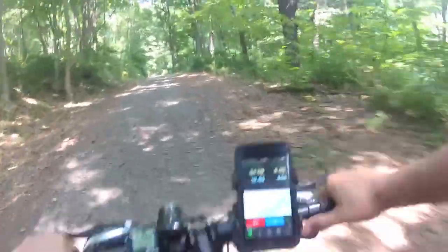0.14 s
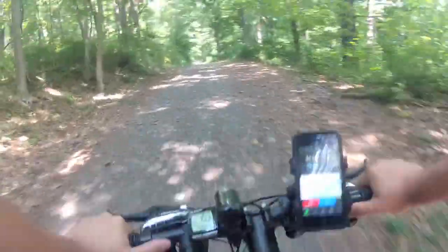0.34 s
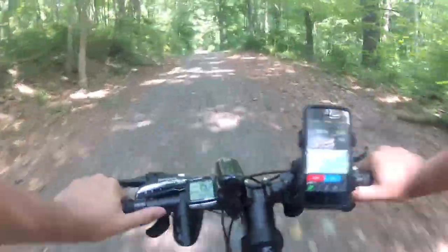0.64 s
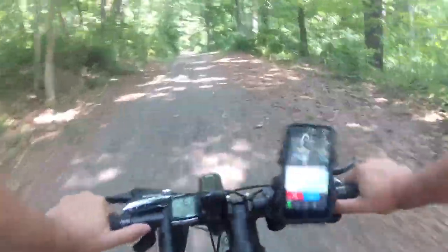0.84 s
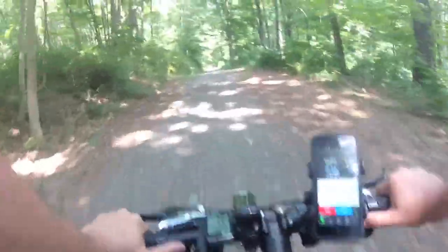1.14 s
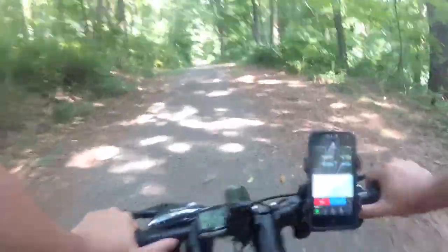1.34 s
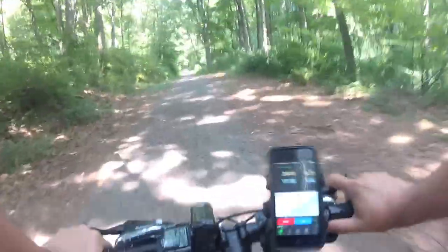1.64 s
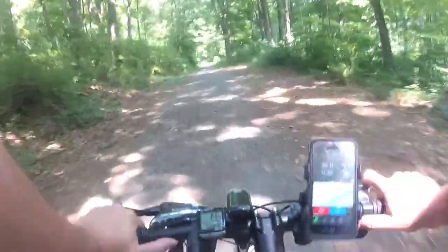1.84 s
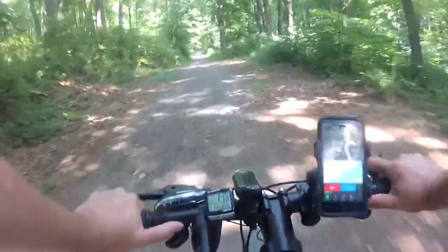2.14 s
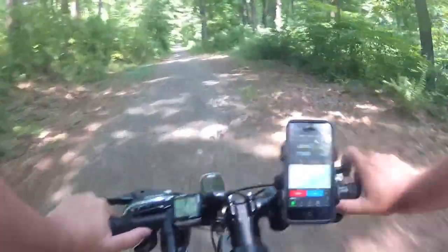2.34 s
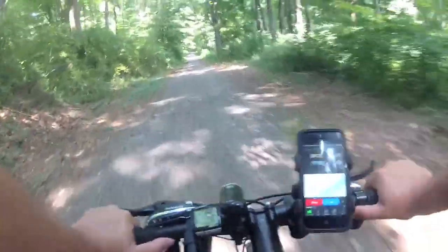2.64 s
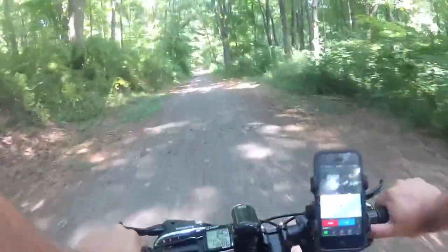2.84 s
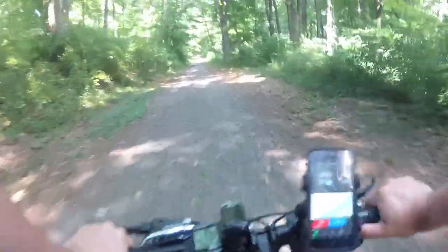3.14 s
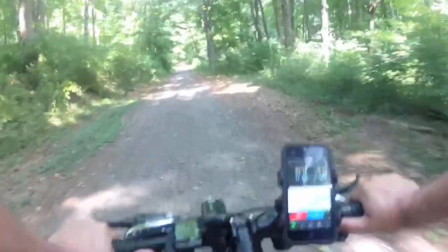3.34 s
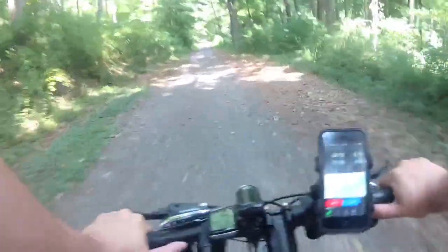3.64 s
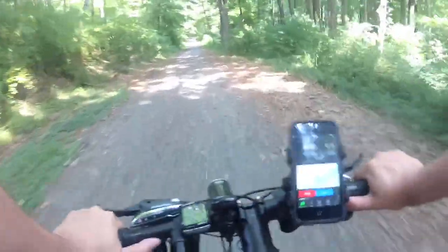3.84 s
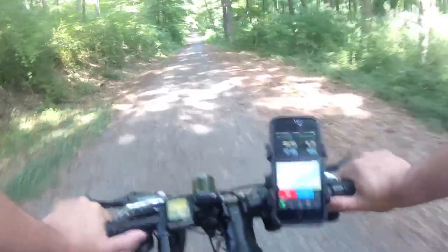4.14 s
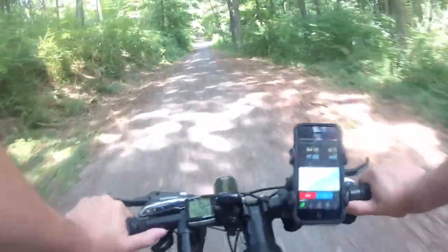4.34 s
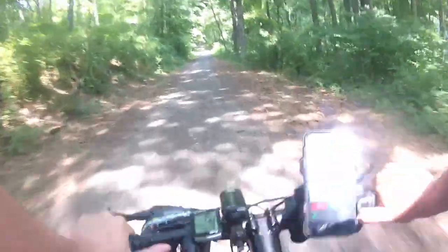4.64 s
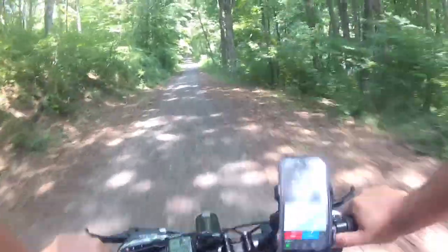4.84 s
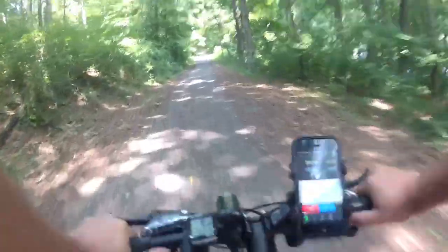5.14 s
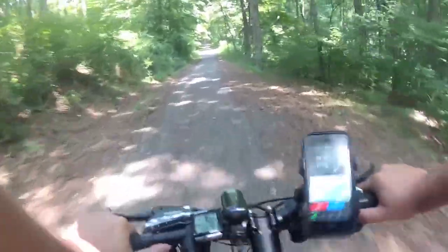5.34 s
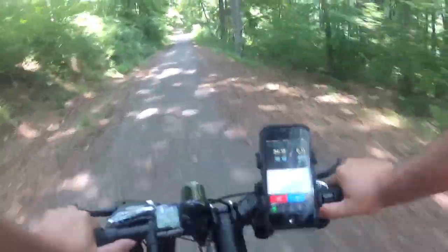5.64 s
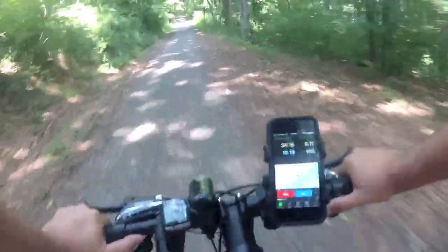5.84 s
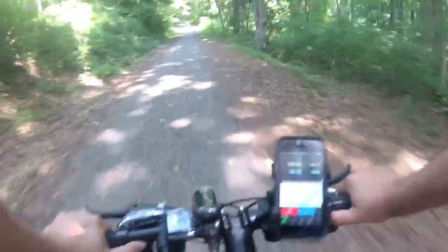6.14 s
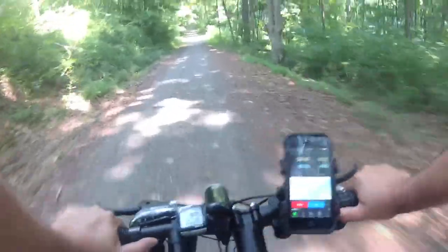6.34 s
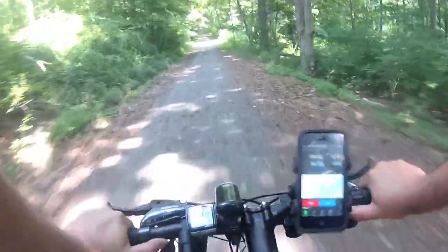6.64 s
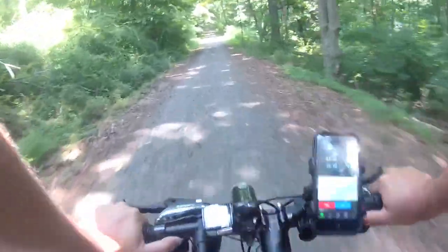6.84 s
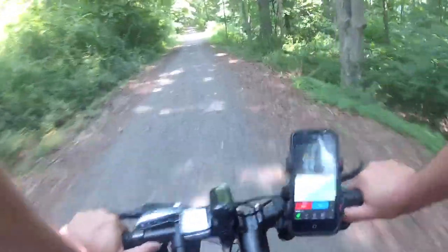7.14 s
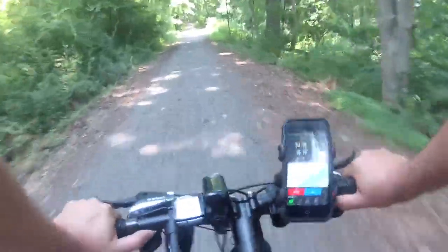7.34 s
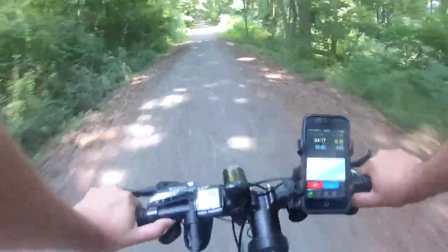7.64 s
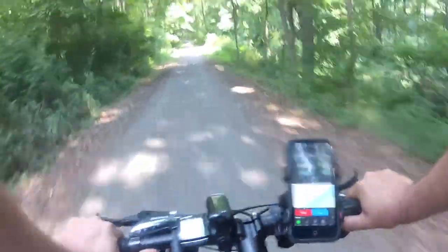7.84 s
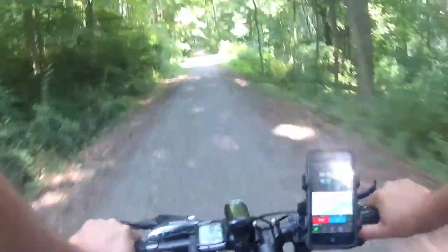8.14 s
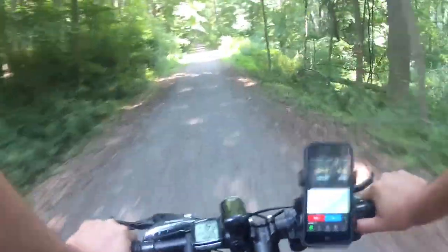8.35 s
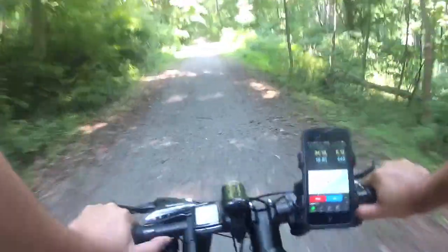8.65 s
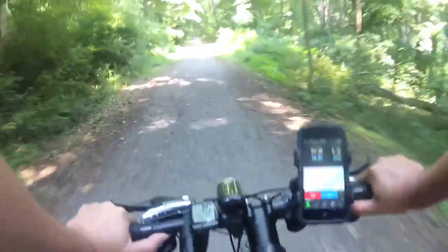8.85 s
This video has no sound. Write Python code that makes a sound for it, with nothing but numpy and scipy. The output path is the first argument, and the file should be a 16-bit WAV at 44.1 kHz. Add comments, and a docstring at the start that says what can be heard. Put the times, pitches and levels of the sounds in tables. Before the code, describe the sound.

Wind buffets a microphone carried by a rider on a woodland gravel trail, a low rumble with a fluttering rush above it. The bicycle's tyres make a continuous gritty crunch and a hollow drone, while flung stones and loose fittings click sharply at irregular moments. The pace is steady at first, then picks up in the second half, and wind, tyres and clicks all grow louder.

```python
"""Wind buffets and rushes past a rider's camera as a bicycle gathers speed down a woodland gravel trail.
Turbulent eddies on the case make the wind; the tyres snap pebbles into a crunch and shake the bike into
a drone. All three rise with speed; gusts swell the wind, rough patches the tyres. Flung stones and loose
fittings click on the bike. The camera's slow sample-and-hold mirrors the sound into a gritty treble."""
import sys
import numpy as np
from scipy import signal
from scipy.fft import rfft, irfft, next_fast_len
from scipy.io import wavfile
from scipy.ndimage import map_coordinates

SR = 44100
rng = np.random.default_rng(int(sys.argv[2]) if len(sys.argv) > 2 else 0)


def log_audio(samples):
    """Write samples as a 16-bit WAV file to the path given in sys.argv[1]."""
    # one column per channel
    frames = np.atleast_2d(samples).T
    # limit to full scale, then quantise
    limited = np.clip(frames, -1, 1)
    pcm = np.round(limited * 32767).astype(np.int16)
    wavfile.write(sys.argv[1], SR, pcm)


N = 396459

# spectra of the large and of the small eddies: frequency_hz, gain_db
BUFFET_SPECTRUM = [(12, -22), (28, -9), (55, -3), (90, -1), (150, -3), (250, -5.5), (400, -16),
                   (700, -28.5), (1500, -71)]
RUSH_SPECTRUM = [(100, -20), (250, -2), (330, 0.5), (480, 0), (690, -5.5), (830, -9.5), (1000, -20),
                 (1400, -29.5), (3000, -33), (6000, -71)]
# gusts and lulls: middle_s, length_s, strength_db
GUSTS = [(.57, 1, 7.5), (1.1, .4, 4.5), (1.62, 0.31, -7), (1.95, 0.36, 2.5), (2.33, 0.33, 5.5),
         (3.15, 1, -1), (3.7, 0.88, 4), (4.1, 0.42, 4), (5.79, .16, 7.5), (6.02, 0.2, 6), (7.05, 0.54, 2.5),
         (7.48, 0.52, 6.5), (8.3, 0.52, -1.5), (8.69, 0.13, 6), (8.92, 0.1, 5.5)]

def wind(lump_db=1.2, flutter_db=2, drift_db=0.94, rush_gust_share=0.13):
    """Turbulent pressure: large eddies thump on the case, small ones rush past in quick flurries."""
    gust_db = swells(GUSTS)[0] + drift_db * wobble(8)
    eddies = wobble(60)
    buffet = unit(coloured(rng.standard_normal(N), BUFFET_SPECTRUM) * amp(lump_db * eddies))
    rush = coloured(rng.standard_normal(N), RUSH_SPECTRUM)
    rush = unit(rush * amp(eddies + flutter_db * wobble(140)))
    buffet_db = speed_level(start_db=-27, doubling_db=12.8) + gust_db
    rush_db = speed_level(start_db=-28.5, doubling_db=9.2) + rush_gust_share * gust_db
    return amp(buffet_db) * buffet + amp(rush_db) * rush


# spectrum of gravel under the tread: frequency_hz, gain_db
CRUNCH_SPECTRUM = [(200, -44), (700, 1), (1100, -1), (1550, -3.5), (2000, 1.5), (2350, -1), (2800, 3),
                   (3400, -2.5), (4200, -6.5), (5000, -13), (6000, -16)]
# patches of trail that load or unload the tyres: middle_s, length_s, crunch_db, drone_db
PATCHES = [(.25, 0.4, 1, 4), (.7, 0.58, -1.5, 3), (1.0, 0.3, 2, -2), (2.39, 0.3, -4.5, -1),
           (2.54, 0.21, 5.5, 6.5), (3.3, 0.46, 1.5, 0), (4.0, 0.15, 2, 3.5), (6.27, 0.82, 1, 4.5),
           (6.6, 0.54, 2.5, 0.5), (7.42, 0.66, 1, 4.5), (8.26, .25, 4, 8), (8.52, 0.89, 3, 4.5),
           (8.93, 0.13, 2.5, 9.5)]

def gravel(clump_db=2, bump_db=1.75, grit_db=2.0, drift_db=.5, shudder_db=1):
    """Granular impact noise: pebbles snap under the tread in clumps, over the steadier hiss of grit."""
    crunch_db = speed_level(start_db=-34, doubling_db=3.6) + swells(PATCHES)[0] + drift_db * wobble(8)
    load = amp(bump_db * wobble(42) + shudder_db * wobble(240))  # the tyre presses harder on each bump
    snaps = amp(clump_db * wobble(250)) * pebbles()
    crunch = load * (snaps + amp(grit_db) * rng.standard_normal(N))
    return amp(crunch_db) * unit(coloured(crunch, CRUNCH_SPECTRUM))


def pebbles(spread_db=4.5, t60_s=0.0047, count=24000):
    """Shot noise: tiny damped snaps add at random times, each at its own pitch, a few of them large."""
    when, pitch, rank = rng.random((count, 3)).T[:, :, None]
    lag = np.arange(SR // 200)
    pitch_hz = 500 + 5000 * pitch
    size = amp(-spread_db * np.log(np.maximum(rank, .015)))
    snaps = size * np.sin(2 * np.pi * pitch_hz * lag / SR) * amp(-60 * lag / SR / t60_s)
    positions = (when * N).astype(int) + lag
    return unit(np.bincount(positions.ravel(), snaps.ravel(), N)[:N])


def tyre_drone(hum_hz=366, width_hz=38, upper_hz=690, upper_db=-9):
    """Forced resonance: the rolling tyres shake the bike at random and excite two narrow, hollow modes."""
    drone_db = speed_level(start_db=-32.5, doubling_db=6.9) + swells(PATCHES)[1]
    shaking = rng.standard_normal(N)
    modes = [(hum_hz, width_hz, 0), (upper_hz, 2 * width_hz, 0)]
    hum, upper = [unit(resonate(resonate(shaking, [mode]), [mode])) for mode in modes]
    return amp(drone_db) * (hum + amp(upper_db) * upper)


# spectrum of a hard contact: frequency_hz, gain_db
CRACK_SPECTRUM = [(200, 4), (800, -9), (1400, -14.5), (2000, 9.5), (2400, 5), (2800, 11), (3400, -1.5),
                  (4300, -4.5), (6000, -15)]
# hollow resonances of the camera case: centre_hz, width_hz, gain_db
CASE_MODES = [(356, 56, -7), (565, 170, 7.5), (640, 110, -6), (1040, 1200, -20)]
# loud contacts on the bike: start_s, level_db, ring_hz, knock_db (re the click), ring_db (re the crack)
CONTACTS = [(0.288, -8.5, 2000, -16, -1), (0.452, -9.5, 2900, -10, 4), (0.569, -6.5, 2740, -20, 6),
            (0.950, -4, 2010, -9, -12), (1.270, -12.5, 2800, -8, -3), (1.360, -13.5, 2350, -1.5, -9),
            (2.123, -10, 2680, -20, -6), (2.138, 0, 2260, -22, 2), (2.160, -14, 2100, -15, 1),
            (2.236, -6, 2130, -16, 5), (2.503, -13, 2860, 1, 3), (2.552, -10, 2530, -5, -12),
            (2.627, -11, 1930, -16, 2), (2.695, -14, 1990, -12, -11), (3.344, -3, 1900, -8, 4),
            (3.586, -12.5, 3100, -1, -4), (3.715, -2.5, 2500, -5, -8), (3.975, -13, 1820, 4.5, -2),
            (4.051, -8, 2600, -7, -5), (4.135, -1, 2400, -13, 3), (4.890, -11.5, 1890, 7, 4),
            (5.263, -11, 3050, -15, 3), (5.928, -11, 3350, -1.5, 1), (6.092, -4.5, 2230, 4, -6.5),
            (6.329, -10, 2900, -8, -12), (6.818, -7, 1990, -7, -4), (7.182, -8, 2920, -2, 3),
            (7.683, -16, 1900, 13, 2), (7.837, -4, 2070, -9, -7), (7.959, -4, 2390, -0.5, -6),
            (8.043, -10.5, 2020, -2, 1), (8.193, -7, 3340, 0.5, -3), (8.268, -10, 2780, -1, 2),
            (8.358, -2.5, 2890, 0, -8), (8.624, -6.5, 2020, -12, 4), (8.869, -7.5, 1940, -5, 1)]

def clicks(chatter_db=-9, chatter_t60_s=0.011, ring_t60_s=0.012, contact_s=0.00044):
    """Impact excitation: each contact gives a chattering crack, a damped ring and a knock in the case."""
    out, t = np.zeros(N + SR), np.arange(SR // 16) / SR
    blow = 1. * (t == 0)
    half_sine = np.sin(np.pi * np.minimum(t / contact_s, 1))
    knock = resonate(half_sine, CASE_MODES)
    knock /= np.abs(knock).max()
    for start_s, level_db, ring_hz, knock_db, ring_db in small_stones() + CONTACTS:
        chatter = amp(chatter_db - 60 * t / chatter_t60_s) * rng.standard_normal(len(t))
        crack = unit(coloured(blow + chatter, CRACK_SPECTRUM, size=1024))
        ring = unit(np.sin(2 * np.pi * ring_hz * t) * amp(-60 * t / ring_t60_s))
        click = 0.075 * unit(crack + amp(ring_db) * ring)  # a few strong cycles, peaking near 1
        out[round(start_s * SR):][:len(t)] += amp(level_db) * (click + amp(knock_db) * knock)
    return out[:N]


def small_stones(count=48, scatter_db=2.5, low_hz=1900, high_hz=3100, knock_db=-6, ring_db=-3.5):
    """Random arrivals over distance: rows like CONTACTS, more frequent and harder at speed."""
    place, size, pitch = rng.random((count, 3)).T
    distance = np.cumsum(2 ** speed_doublings())
    onset = np.searchsorted(distance, place * distance[-1])
    level_db = speed_level(start_db=-18.5, doubling_db=6)[onset] + scatter_db * (2 * size - 1)
    ring_hz = low_hz + (high_hz - low_hz) * pitch
    return [(s, db, hz, knock_db, ring_db) for s, db, hz in zip(onset / SR, level_db, ring_hz)]


# the bicycle's speed relative to the start: time_s, speed_ratio
RIDE_SPEED = [(0, 1), (3.0, 1), (4.001, 1.2), (5.05, 1.19), (5.45, 1.54), (6.301, 1.56), (6.8, 1.83),
              (9, 1.92)]

def speed_doublings():
    """Logarithmic speed: doublings of the starting speed at each sample."""
    time_s, speed_ratio = np.transpose(RIDE_SPEED)
    return np.log2(np.interp(np.arange(N) / SR, time_s, speed_ratio))


def speed_level(start_db, doubling_db):
    """Power law: the level rises by doubling_db for each doubling of speed."""
    return start_db + doubling_db * speed_doublings()


def swells(rows):
    """Raised-cosine humps from (middle_s, length_s, level_db, ...) rows: one curve per level column."""
    rows, t = np.array(rows), np.arange(N) / SR
    coarse_s = t[::SR // 500]
    phase = (coarse_s - rows[:, :1]) / rows[:, 1:2]
    humps = np.cos(np.pi * np.clip(phase, -.5, .5)) ** 2
    return [np.interp(t, coarse_s, db) for db in rows[:, 2:].T @ humps]


def wobble(rate_hz):
    """Smooth random modulation: a spline through rate_hz Gaussian knots a second."""
    knots = rng.standard_normal(int(N * rate_hz / SR) + 4)
    return map_coordinates(knots, [np.arange(N) * rate_hz / SR])


def coloured(x, spectrum, size=8192):
    """Minimum-phase filtering: x shaped by (frequency_hz, gain_db) points."""
    hz, db = np.transpose(spectrum)
    gain = amp(np.interp(np.log(np.fft.rfftfreq(size, 1 / SR) + 1), np.log(hz), db))
    cepstrum = irfft(np.log(gain))[:size // 2]
    cepstrum[1:] *= 2  # folding onto positive time makes the filter causal
    impulse_response = irfft(np.exp(rfft(cepstrum, size)))
    return signal.fftconvolve(x, impulse_response)[:len(x)]


def resonate(x, modes):
    """Modal superposition: x through parallel (centre_hz, width_hz, gain_db) resonators."""
    return filtered(x, lambda hz: sum(amp(db) * 1j * hz * width / (centre**2 - hz**2 + 1j * hz * width)
                                      for centre, width, db in modes))


def filtered(x, response):
    """Linear filtering: the spectrum of x times a complex frequency response."""
    size = next_fast_len(len(x) + SR // 10)
    return irfft(rfft(x, size) * response(np.fft.rfftfreq(size, 1 / SR)), size)[:len(x)]


def amp(db):
    """Decibels to amplitude ratio."""
    return 10 ** (np.asarray(db) / 20)


def unit(x):
    """Normalisation to rms 1."""
    return x / np.sqrt(np.mean(x ** 2) + 1e-20)


def scene():
    """Superposition: wind, tyres and clicks add at one microphone."""
    return (wind() + gravel() + tyre_drone() + clicks())[None]


def record(dry, edge_hz=5400, hold_hz=12000, top_hz=15350):
    """Spectral imaging: the camera's sample-and-hold mirrors the band-limited sound around hold_hz."""
    narrow = filtered(dry[0], lambda hz: (hz < hold_hz / 2) / np.sqrt(1 + (hz / edge_hz) ** 20))
    rounded = narrow / (1 + narrow ** 10) ** (1 / 10)  # soft saturation of the peaks
    mirrored = rounded * (1 + 2 * np.cos(2 * np.pi * hold_hz * np.arange(N) / SR))
    return filtered(mirrored, lambda hz: np.sinc(hz / hold_hz) * (hz < top_hz))[None]


dry = scene()
out = record(dry)
log_audio(out)
```